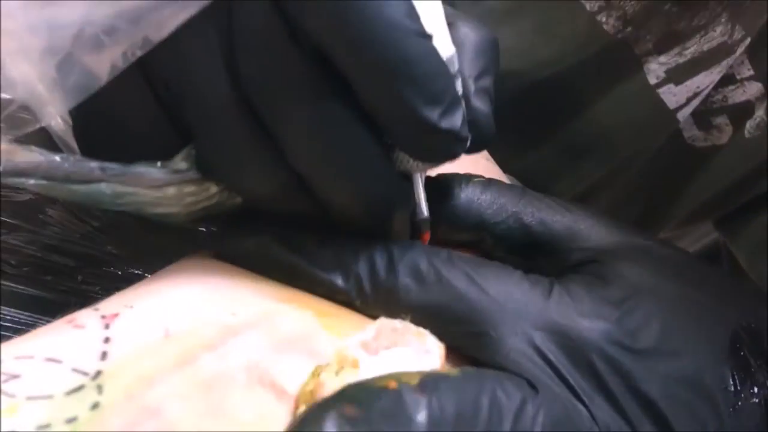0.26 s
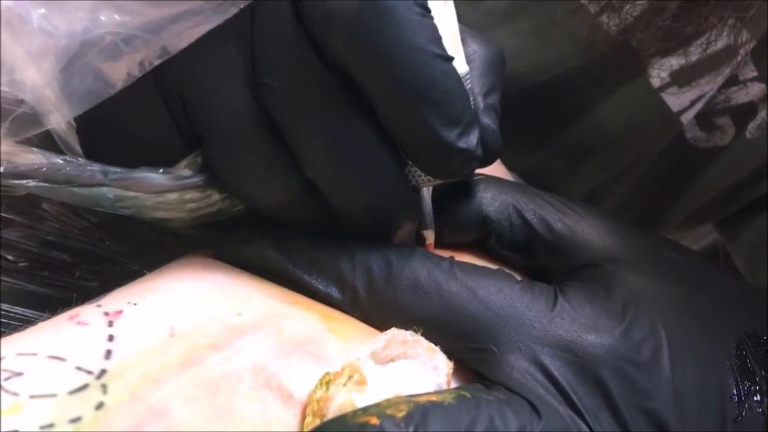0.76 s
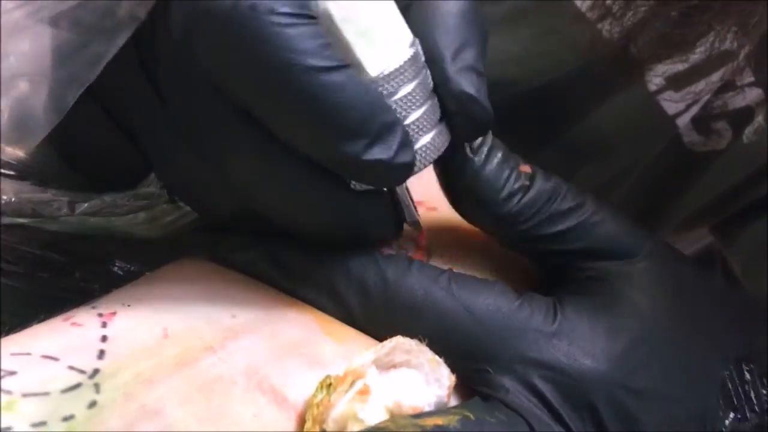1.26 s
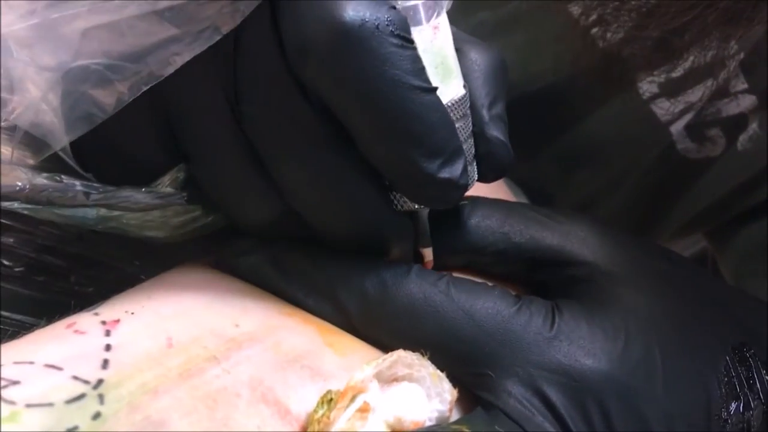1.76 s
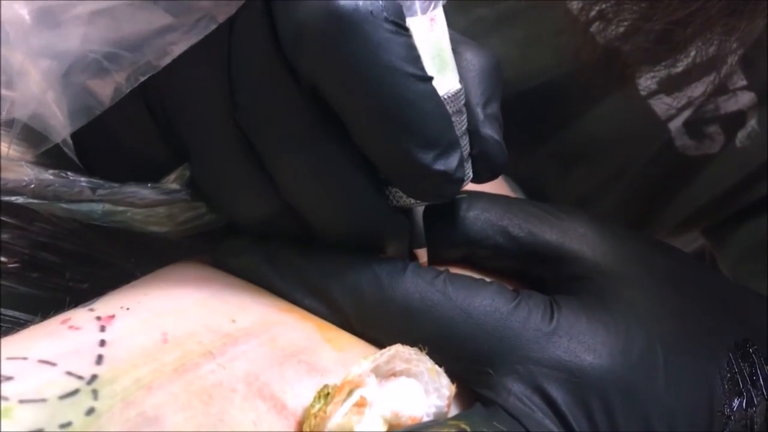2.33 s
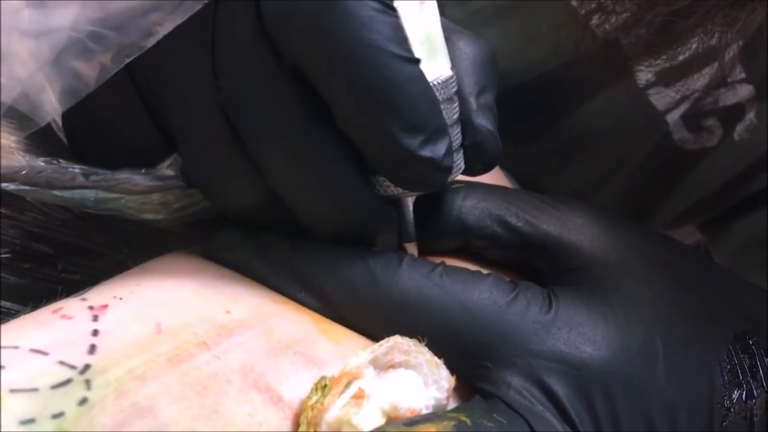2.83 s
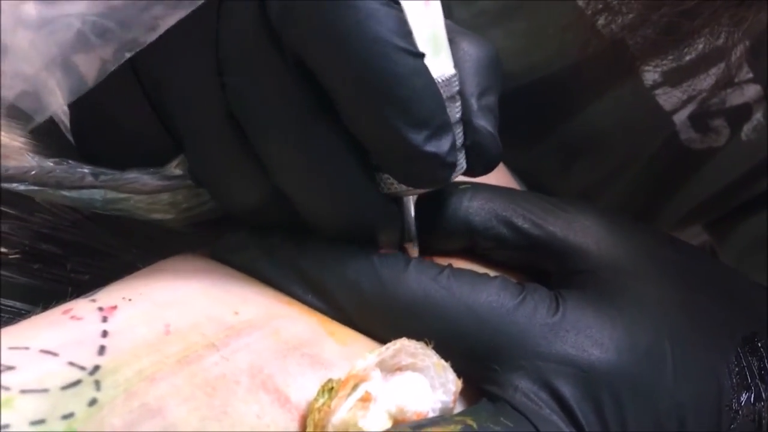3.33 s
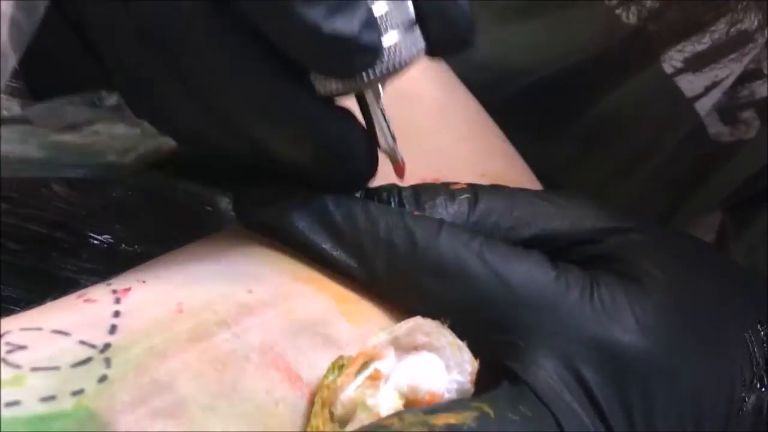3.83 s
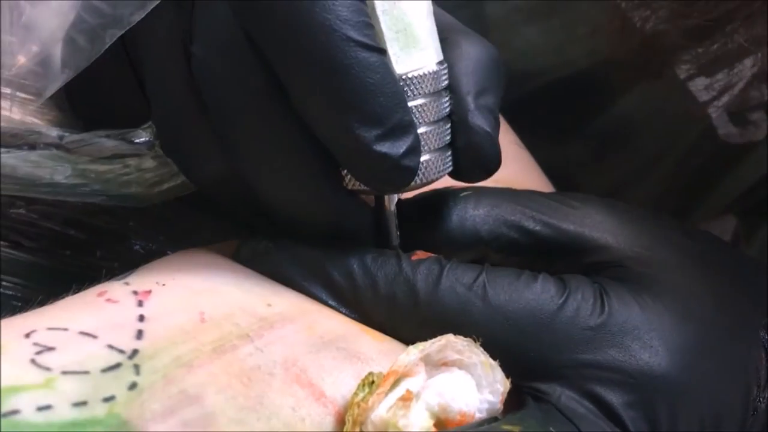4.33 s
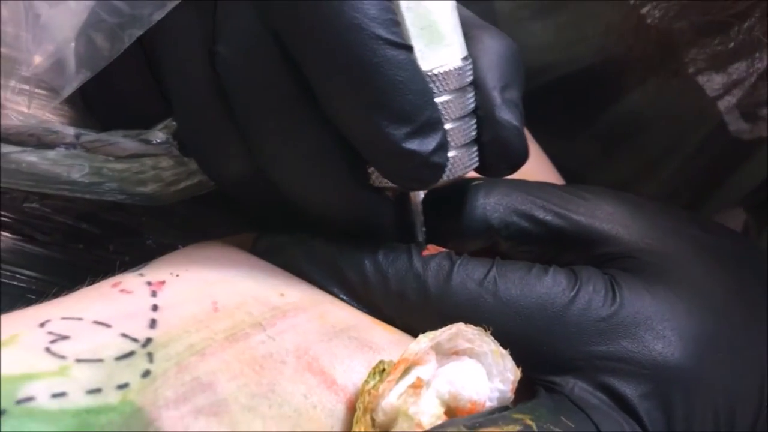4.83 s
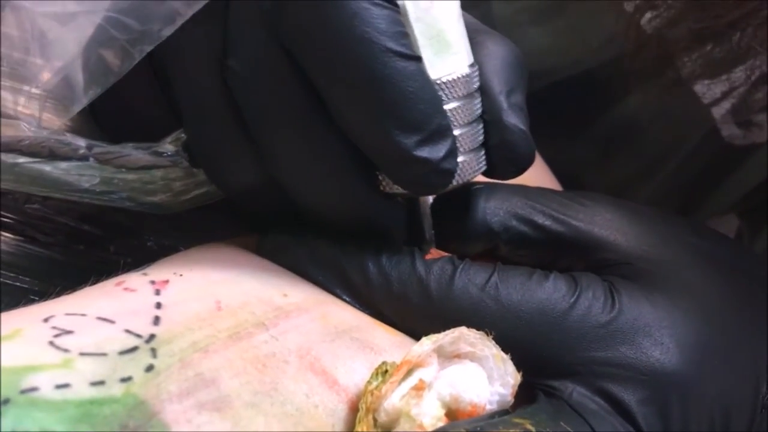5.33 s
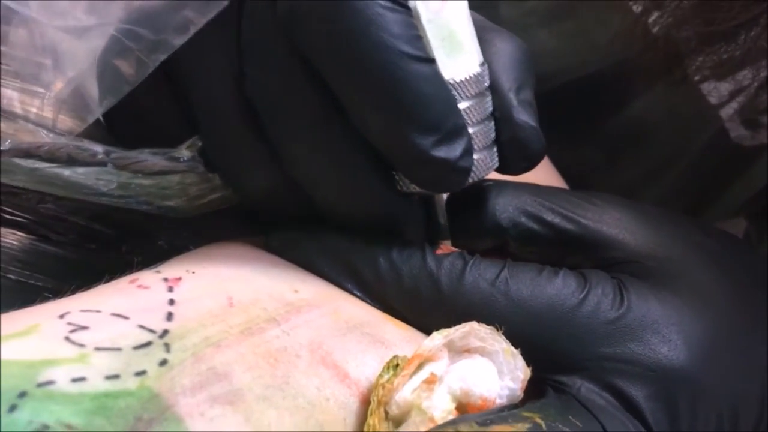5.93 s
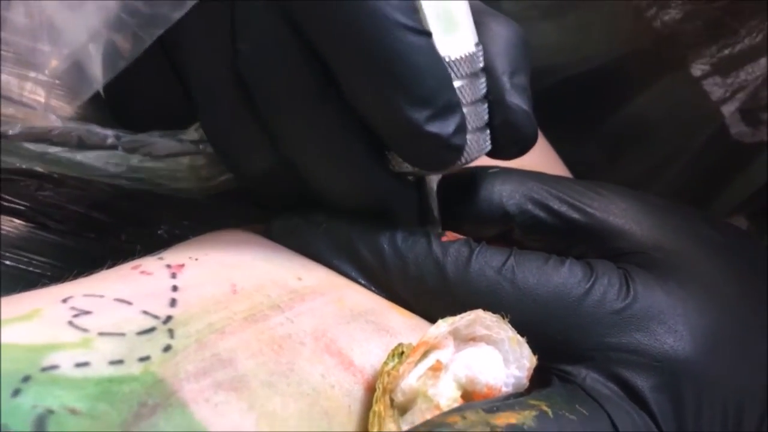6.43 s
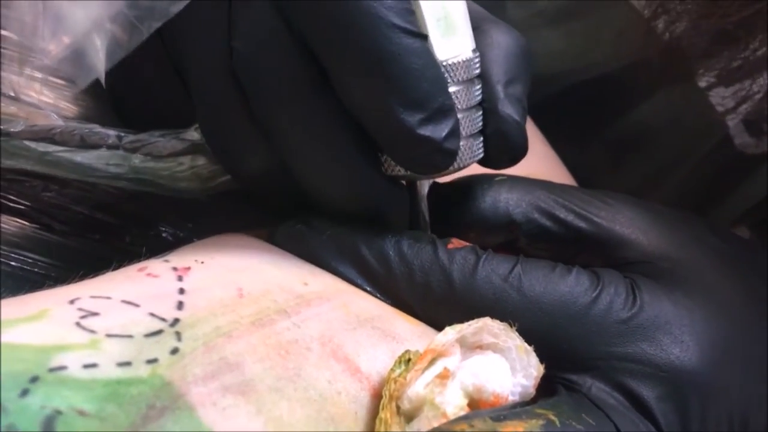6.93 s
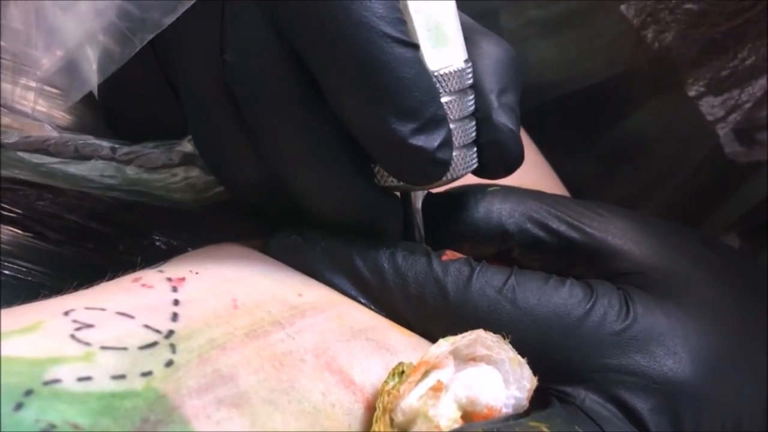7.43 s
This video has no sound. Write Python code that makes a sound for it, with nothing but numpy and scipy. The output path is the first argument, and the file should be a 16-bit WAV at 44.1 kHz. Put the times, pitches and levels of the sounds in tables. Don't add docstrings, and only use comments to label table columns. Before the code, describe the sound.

A small coil tattoo machine runs throughout, close to a phone in a quiet little studio. Its buzz is a low hum near 209 blows a second, topped by a strong nasal ring around 2.5 kHz, metallic frame clatter and a bright fizzing rattle. At the very start, until about 0.3 s, the needle runs mostly free and the top is sharper; then it settles into skin. Pitch slips slightly up at 0.5 s and again at 1.4 s, with a bright flick, and sags a little near 2.7 and 3.5 s. Around 3.8 s the hand takes a new hold and the ring changes colour, brighter at first. Tiny watery dropouts flicker throughout, deepest near 4.5 and 7.1 s, leaving thin whistling tones. Slight brightening comes around 5.7-6 s. From 6.9 s to the end at 7.7 s, dull low arm rubs on padding sit under the buzz, over faint room air and mains hum.

```python
import sys
import numpy as np
from scipy import signal
from scipy.fft import rfft, irfft, next_fast_len
from scipy.io import wavfile
from scipy.ndimage import uniform_filter1d

SR = 44100
rng = np.random.default_rng(int(sys.argv[2]) if len(sys.argv) > 2 else 0)


def materialize(psi):
    bounded = np.clip(np.atleast_2d(psi).T, -1, 1)
    quanta = np.round(bounded * 32767).astype(np.int16)
    wavfile.write(sys.argv[1], SR, quanta)


def gain_from_db(level_db):
    decades = np.asarray(level_db, float) / 20
    return 10 ** decades


N = 338727

REGRIP_S, REGRIP_TAKES_S = 3.76, 0.2
# middle_s, bottom_length_s, depth_db, clearest_held_tone_hz
THINNINGS = [(.024, .005, -11.7, 6101), (.213, .006, -8.9, 13451), (.381, .007, -9.4, 1249),
             (.436, .004, -7.2, 2311), (.520, .021, -16.9, 8297), (.656, .008, -24.4, 7924),
             (.693, .004, -10.9, 7924), (1.020, .003, -17.3, 6474), (1.488, .008, -24.2, 6604),
             (2.890, .005, -11.6, 7752), (3.345, .003, -17.3, 4766), (3.880, .003, -18.8, 7565),
             (4.059, .004, -13, 6546), (4.273, .013, -16.7, 7565), (4.433, .003, -19.1, 14944),
             (4.526, .027, -39.2, 7809), (4.611, .005, -11.6, 4795), (4.698, .005, -13.1, 7537),
             (4.775, .003, -17.3, 6690), (4.943, .015, -15.6, 6647), (4.973, .005, -16.6, 14743),
             (5.180, .003, -18.6, 14585), (5.833, .005, -11.6, 15461), (5.877, .006, -10.6, 10724),
             (6.510, .005, -11.8, 4823), (6.866, .005, -8.3, 6690), (7.036, .003, -16.4, 7537),
             (7.111, .020, -38.9, 6718), (7.164, .005, -18.1, 7752), (7.250, .003, -15.9, 4795)]


def rms_one(x):
    return x / np.sqrt(np.mean(np.abs(x) ** 2) + 1e-20)


def curve(rows):
    time_s, value = np.transpose(rows)
    return np.interp(np.arange(N) / SR, time_s, value)


def plateau(start, length, rise, fall):
    corners = [start - rise, start, start + length, start + length + fall]
    return np.interp(np.arange(N) / SR, corners, [0, 1, 1, 0])


def by_hold(first, second):
    return np.interp(np.arange(N) / SR, [REGRIP_S, REGRIP_S + REGRIP_TAKES_S], [first, second])


def drift(rate):
    r = np.exp(-80 * np.pi * rate / SR)
    noise = rng.standard_normal(N // 40 + 2002)
    slow = signal.lfilter([1], [1, -2 * r, r * r], noise)[2000:]
    return np.interp(np.arange(N) / 40, np.arange(len(slow)), rms_one(slow))


def band(x, low_hz, high_hz):
    sos = signal.butter(2, [low_hz, high_hz], "band", fs=SR, output="sos")
    return rms_one(signal.sosfilt(sos, x))


def stroke_turns():
    # time_s, twelfth_multiple_hz
    speed = [(0, 2535), (.38, 2503), (.75, 2503), (1.35, 2491), (1.63, 2491), (2.03, 2480), (2.2, 2501),
             (2.8, 2503), (2.91, 2517), (3.5, 2497), (3.8, 2510), (3.98, 2530), (4.53, 2523), (4.79, 2502),
             (6.1, 2500), (6.5, 2512), (7.29, 2513), (7.68, 2492)]
    # start_s, length_s, change_of_twelfth_multiple_hz
    load_steps = [
        (.45, .16, 42),
        (1.41, .1, 60),
        (2.65, .11, -30),
        (3.53, .04, -28),
        (3.7, .06, -28),
        (6.17, .01, -22),
    ]
    rate = curve(speed) / 12
    rate += sum(hz * plateau(s, length, rise=.04, fall=.08) for s, length, hz in load_steps) / 12
    return np.cumsum(rate * (1 + .0025 * drift(30))) / SR


def contacts(turns, jitter_s):
    count = np.arange(1, int(turns[-1]))
    return np.interp(count, turns, np.arange(N)) + jitter_s * SR * rng.standard_normal(len(count))


def hum(turns):
    # time_s, level_db
    swing = [(0, -57), (.19, -45.5), (.36, -42), (1.36, -42.5), (1.42, -49), (1.47, -39.5), (1.56, -43),
             (3.85, -43), (3.98, -49.5), (4.15, -46), (4.25, -51), (4.36, -47), (6.2, -41.5), (6.6, -47.5),
             (7.04, -47.5), (7.12, -34), (7.27, -54), (7.68, -38)]
    # multiple, level_db (against the overtone level)
    multiples = [(2, -24), (3, -19.5), (4, -22.5), (5, -44)]
    hum_db = curve(swing) - 67 * plateau(4.526 - .015, 0.024, rise=0.028, fall=.03) ** 2
    phase = 2 * np.pi * turns + 0.21 * drift(8.0)
    overtones = sum(gain_from_db(db + 5.2 * drift(9.3)) * np.sin(k * phase) for k, db in multiples)
    stroke = -np.sqrt(2) * gain_from_db(hum_db + 1.03 * drift(21)) * np.sin(phase)
    return stroke, np.sqrt(2) * gain_from_db(-47.0) * overtones


def frame_ring(turns, thin):
    # time_s, level_db
    freedom = [(0, -49), (.19, -41.5), (.36, -44.5), (.56, -41.5), (.8, -46), (1.35, -45), (1.46, -39),
               (1.6, -42.5), (2.6, -43.5), (3.55, -45), (3.76, -45), (3.86, -41.5), (4.0, -45), (4.5, -41),
               (5.2, -41.5), (5.9, -40), (6.6, -42.5), (7.68, -43)]
    phase = 2 * np.pi * turns
    ring = gain_from_db(curve(freedom))
    eleventh_db = by_hold(-12.0, -35.0) + by_hold(0.9, 1.3) * drift(5.7)
    grip_db = by_hold(-58, -54) + 3.0 * drift(4)
    twelfth = gain_from_db(1.3 * drift(50)) * np.sin(12 * phase + .3 * drift(30))
    eleventh = gain_from_db(eleventh_db) * np.sin(11 * phase + .3 * drift(15))
    grip_tone = gain_from_db(grip_db) * np.sin(23 * phase + .5 * drift(20))
    return np.sqrt(2) * (ring * twelfth + thin * (ring * eleventh + grip_tone))


def struck(at, modes, memory, loose, echo_db, smear_db):
    out = np.zeros(N)
    rattle = rng.standard_normal(N) * np.sqrt(len(at) / N)
    for hz, width_hz, first_db, second_db in modes:
        w = 2 * np.pi * hz / SR
        hold_db = np.where(np.arange(N) < REGRIP_S * SR, first_db, second_db)
        hold = gain_from_db(hold_db + 2.0 * drift(2))
        clicks = gain_from_db(smear_db) * rattle.astype(complex)
        lags_s = np.append(0, .0008 + .0036 * rng.random(4))
        for lag_s in lags_s:
            chance = rng.standard_normal((len(at), 2))
            wander = signal.lfilter([1], [1, -2 * memory, memory ** 2], chance, axis=0)
            strength, turn = rms_one(wander).T
            blow = gain_from_db(2.5 * strength) * np.exp(1j * (2 * np.pi * rng.random() + loose * turn))
            when = np.clip(at + lag_s * SR, 0, N - 2)
            index = np.ceil(when).astype(int)
            share_db = echo_db - 1200 * lag_s if lag_s else 0
            clicks[index] += gain_from_db(share_db) * blow * np.exp(1j * w * (index - when))
        pole = np.exp(-1.5 * np.pi * width_hz / SR + 1j * w)
        ring = signal.lfilter([1], [1, -2 * pole, pole * pole], clicks).real
        out += hold * (1 - abs(pole)) * ring
    return out / np.sqrt(uniform_filter1d(out ** 2, size=9000) + 1e-20)


def part_db(first_db, second_db, follows, free_db):
    # time_s, level_db
    facing = [(0, 5.5), (.2, 1.5), (.5, 0), (1.05, -2), (1.35, -1), (1.8, 0), (2.3, -1.5), (2.7, -3.5),
              (3.15, 0), (3.7, -4.5), (3.85, 4.5), (4.25, 3), (4.6, 0.5), (5, 0), (5.9, -3), (6.6, -0.5),
              (7.2, -0.5), (7.68, -1.5)]
    # start_s, length_s, share_of_full_freedom (0-1)
    lifts = [
        (0.084, .2, 0.75),
        (1.416, 0.088, 0.83),
        (5.69, 0.36, 0.24),
    ]
    free = sum(share * plateau(s, length, rise=0.041, fall=0.041) for s, length, share in lifts)
    return by_hold(first_db, second_db) + follows * curve(facing) + free_db * free


def frame_body(at):
    # pitch_hz, width_hz, first_hold_db, second_hold_db
    body_modes = [(1312, 286, 0.5, 3.5), (1754, 490, 8, 7), (1920, 220, -10, 3.5), (2260, 315, 10, 10)]
    return gain_from_db(-47.5) * struck(at, body_modes, memory=.72, loose=1.1, echo_db=-4, smear_db=-17)


def bar_spring(at):
    # pitch_hz, width_hz, first_hold_db, second_hold_db
    spring_modes = [(3040, 1620, 11, 4), (2932, 285, -5, 0), (3510, 490, -1.5, -10), (3667, 1170, -6, 0),
                    (3785, 820, 7, 3)]
    return gain_from_db(-47.5) * struck(at, spring_modes, memory=.62, loose=1.1, echo_db=-4, smear_db=-8)


def hand_grip(at):
    # pitch_hz, width_hz, first_hold_db, second_hold_db
    grip_modes = [(4850, 530, -8.5, -10), (4836, 380, -3, -3), (5515, 150, -10, -10.5), (6633, 740, 7, 5),
                  (6743, 226, -10, -7.5), (7670, 720, -11, 4.5), (7890, 810, 8.5, 0),
                  (8120, 810, -7.5, -7.5)]
    level = gain_from_db(part_db(-36, -38, follows=0.37, free_db=0))
    return level * struck(at, grip_modes, memory=.68, loose=.95, echo_db=-6, smear_db=-8)


def needle_tube(at):
    # pitch_hz, width_hz, first_hold_db, second_hold_db
    tube_modes = [(9230, 400, -7.5, -5.5), (10210, 630, -2.5, -9), (10800, 850, -6, 5),
                  (11300, 600, -4.5, 1), (12430, 1900, 7, -3)]
    level = gain_from_db(part_db(-41, -37.5, follows=0.92, free_db=0.5))
    return level * struck(at, tube_modes, memory=.66, loose=.95, echo_db=-9, smear_db=-8)


def armature_bar(at):
    # pitch_hz, width_hz, first_hold_db, second_hold_db
    bar_modes = [(12900, 600, -4, -8), (13400, 550, -2, -1), (13950, 600, -2, -3), (14550, 500, 1, 0),
                 (15100, 600, -2, -1), (15550, 550, -1, 2)]
    level = gain_from_db(part_db(-39, -35, follows=0, free_db=9.0))
    return level * struck(at, bar_modes, memory=.66, loose=.95, echo_db=-7, smear_db=-7)


def clatter(at):
    parts = frame_body(at) + bar_spring(at) + hand_grip(at) + needle_tube(at) + armature_bar(at)
    null_hz, null_width_hz = 2140, 182
    parts = signal.lfilter(*signal.iirnotch(null_hz, null_hz / null_width_hz, fs=SR), parts)
    return gain_from_db(0.6 * drift(8.2)) * parts


def gap_times(s, bottom_s, depth_db):
    fade = .008 - .00025 * depth_db
    return s - bottom_s / 2 - 1.37 * fade, s - bottom_s / 2, s + bottom_s / 2, s + bottom_s / 2 + fade


def thinning():
    t, db = np.arange(N) / SR, np.zeros(N)
    for s, bottom_s, depth_db, _ in THINNINGS:
        times = gap_times(s, bottom_s, depth_db)
        span = slice(int(max(times[0], 0) * SR), int(times[-1] * SR))
        dip_db = depth_db * np.interp(t[span], times, [0, 1, 1, 0]) ** 1.9
        db[span] = np.minimum(db[span], dip_db)
    return gain_from_db(db)


def held_partials():
    # middle_s of the thinning, then one to three of pitch_hz
    also_held = [(.024, 10322, 14958), (.213, 13236, 14499), (.520, 14327), (1.020, 8355),
                 (1.488, 13853, 14915), (2.890, 7953), (3.345, 7651), (3.880, 7795, 10939, 11355),
                 (4.059, 10350), (4.273, 4823, 10709), (4.526, 4823, 6718, 11140),
                 (4.526, 14542, 14958, 15360), (4.611, 11082, 11283), (4.698, 14858), (4.775, 7522, 14829),
                 (4.943, 2283, 14556), (5.833, 10652), (5.877, 14643), (6.510, 11125),
                 (6.866, 10680, 13394), (7.036, 7738, 11283), (7.111, 11283, 14657)]
    out = np.zeros(N)
    for s, bottom_s, depth_db, clearest_hz in THINNINGS:
        start, *_, end = gap_times(s, bottom_s, depth_db)
        n = np.arange(max(int((start - .002) * SR), 0), int((end + 0.0014) * SR))
        fade = np.sqrt(2) * np.sin(np.pi * (n - n[0]) / len(n)) ** 1.5
        tones_hz = [clearest_hz]
        for when, *more_hz in also_held:
            if when == s:
                tones_hz += more_hz
        for hz in tones_hz:
            db = -47 if hz < 3000 else -41 if hz < 9000 else -40
            out[n] += gain_from_db(db) * fade * np.sin(2 * np.pi * (hz * n / SR + rng.random()))
    return out


def arm_rest():
    # start_s, length_s, level_db
    shifts = [
        (6.87, 0.091, -51),
        (7.137, 0.15, -54),
        (7.333, 0.15, -43),
        (7.587, 0.076, -43.5),
    ]
    level = sum(gain_from_db(db) * plateau(s, length, rise=.03, fall=0.089) ** 2 for s, length, db in shifts)
    push = rng.standard_normal(N)
    boom = band(push, 239, 298) + gain_from_db(8.5) * band(push, 194, 237) + gain_from_db(-3.0) * band(push, 106, 154)
    return level * boom


def studio():
    # pitch_hz, level_db (per Hz)
    room_air = [(15, -56), (25, -31.5), (119, -12.5), (173, -23), (186, 3), (206, 19), (232, -20),
                (444, -20), (615, -23.5), (913, -26.5), (1220, -28), (1330, -39.5), (1500, -20.5),
                (1950, -49), (3300, -120)]
    hz, db = np.transpose(room_air)
    air = np.zeros(N)
    lumps_db = 4.5 * drift(5)
    white = rng.standard_normal((2, N))
    edges_hz = 25 * 2 ** np.arange(0, 6.1, 1 / 3)
    for k, (low, high) in enumerate(zip(edges_hz, edges_hz[1:])):
        level_db = np.interp(np.log(low * high) / 2, np.log(hz), db) + 2.54 * drift(9.3)
        if low < 75:
            level_db = level_db + lumps_db
        air += gain_from_db(level_db) * np.sqrt(high - low) * band(white[k % 2], low, high)
    mains_phase = 2 * np.pi * 118.7 * np.arange(N) / SR + 1.8 * drift(5)
    mains = gain_from_db(-57 + 5.6 * drift(6.2)) * np.sin(mains_phase)
    return gain_from_db(-48.5) * rms_one(air) + mains


def scene():
    turns = stroke_turns()
    at = contacts(turns, jitter_s=.000004)
    stroke, overtones = hum(turns)
    broad = clatter(at) + overtones + arm_rest() + studio()
    thin = thinning()
    hum_gain = thin ** by_hold(0.063, 0.29)
    mix = thin * broad + hum_gain * stroke + frame_ring(turns, thin) + held_partials()
    return mix[None]


def band_limit(x):
    return signal.sosfilt(signal.butter(12, 17050, fs=SR, output="sos"), x)


def record(dry):
    size = next_fast_len(N)
    spectrum = rfft(dry, size)
    hz = np.linspace(0, SR / 2, spectrum.shape[-1])
    edge = np.clip((15850 - hz) / 150, 0, 1) ** 2
    mix = irfft(spectrum * edge, size)[:, :N]
    return band_limit(mix)


dry = scene()
out = record(dry)
materialize(out)
```